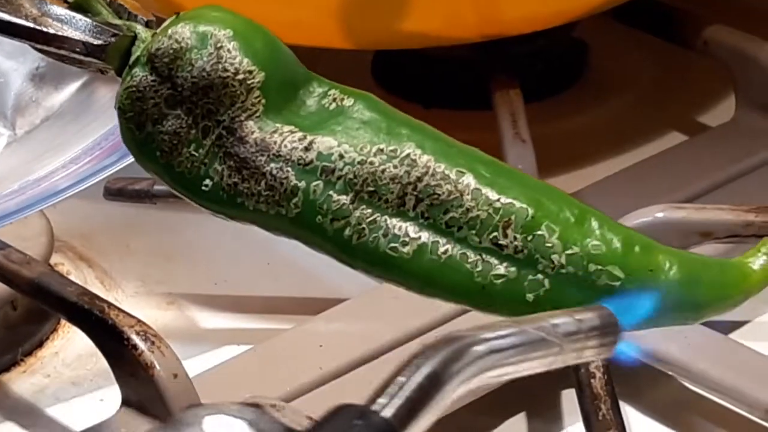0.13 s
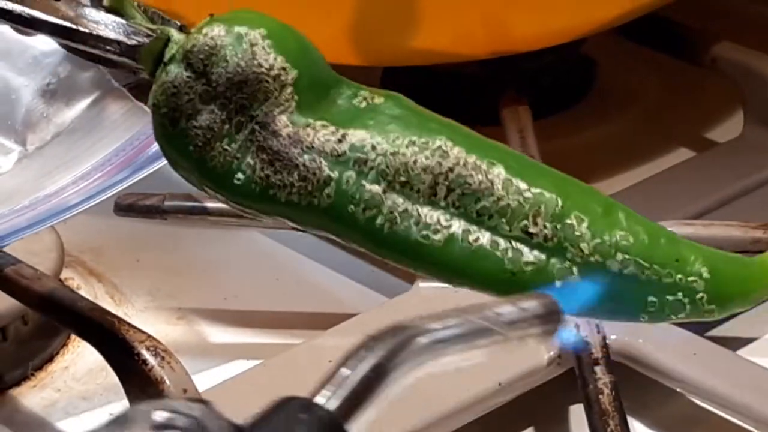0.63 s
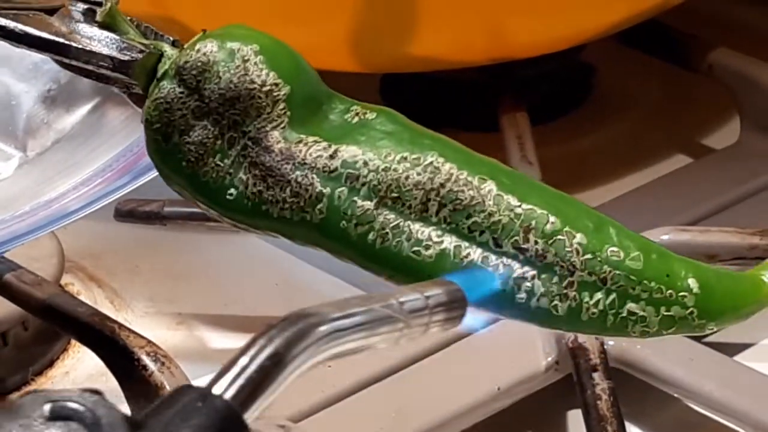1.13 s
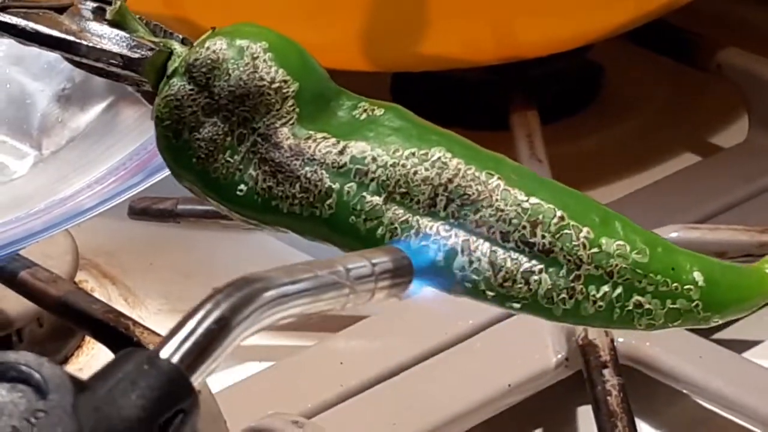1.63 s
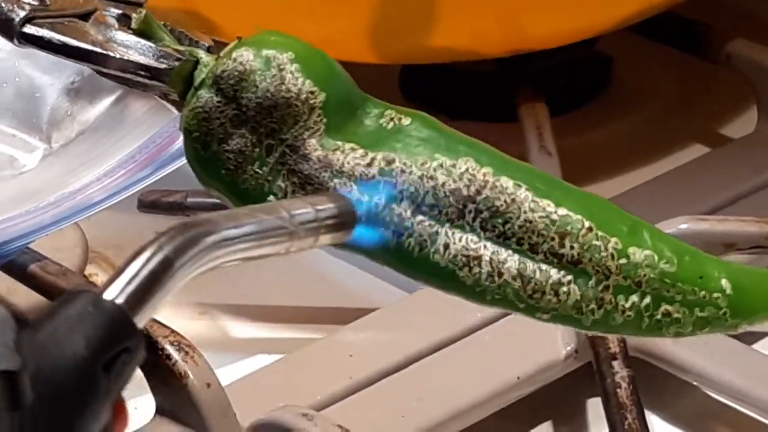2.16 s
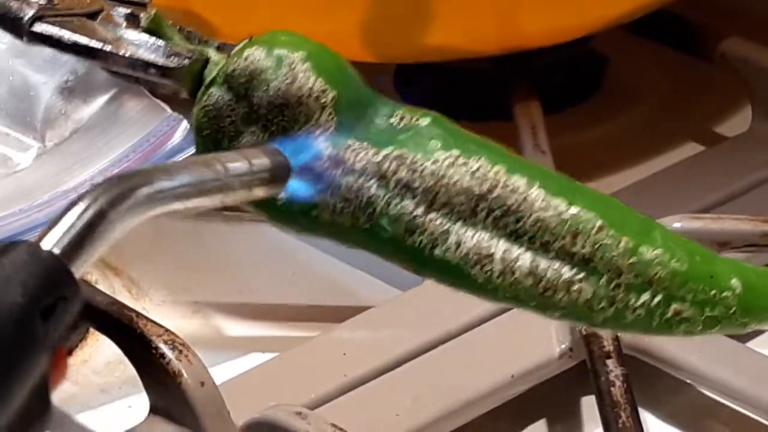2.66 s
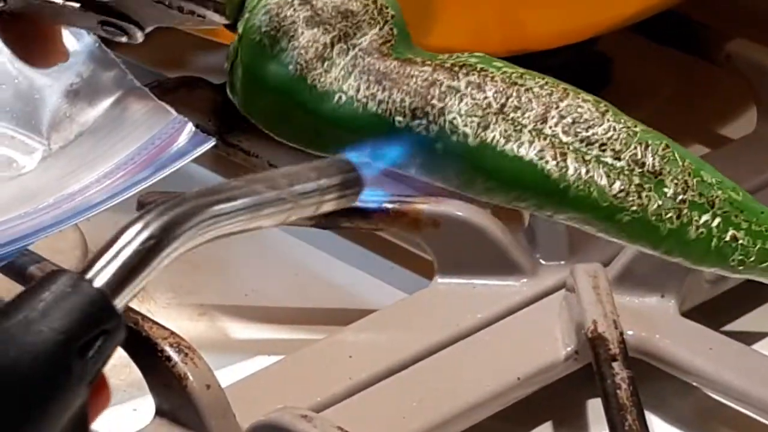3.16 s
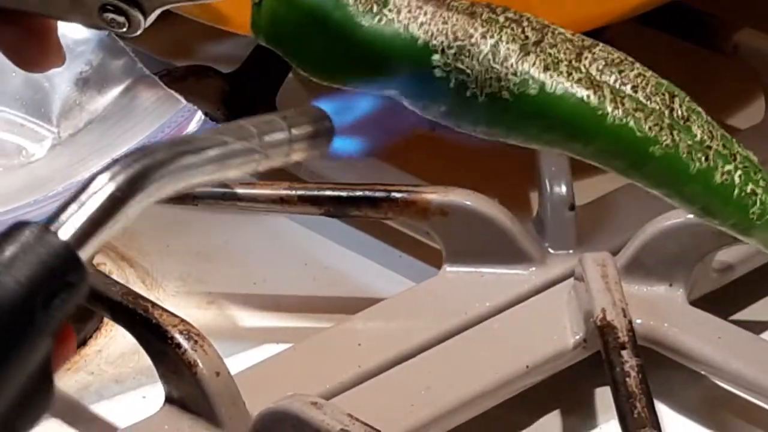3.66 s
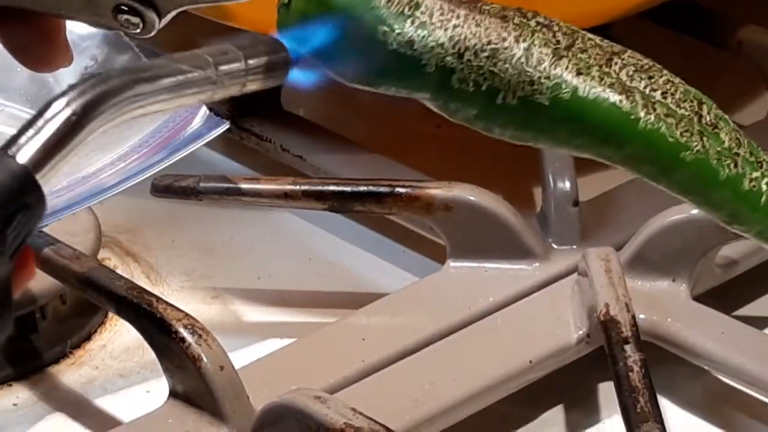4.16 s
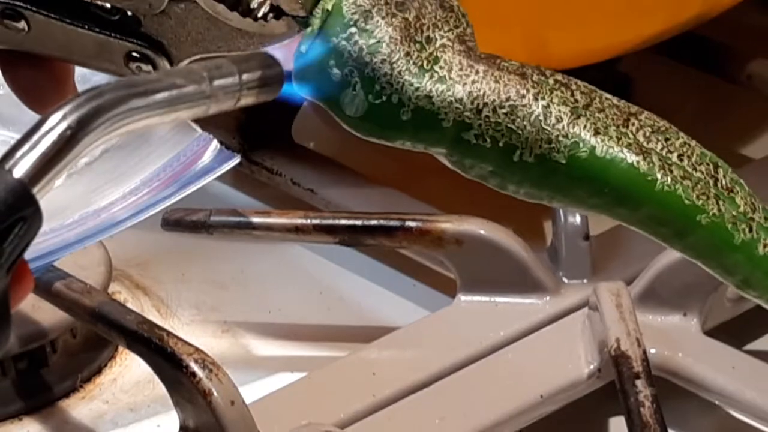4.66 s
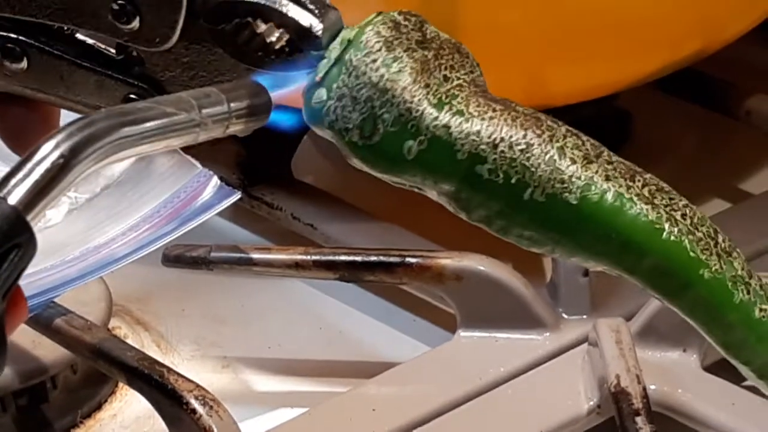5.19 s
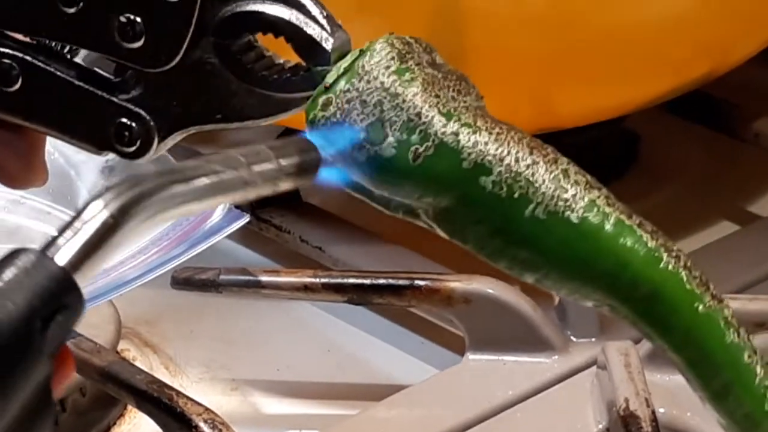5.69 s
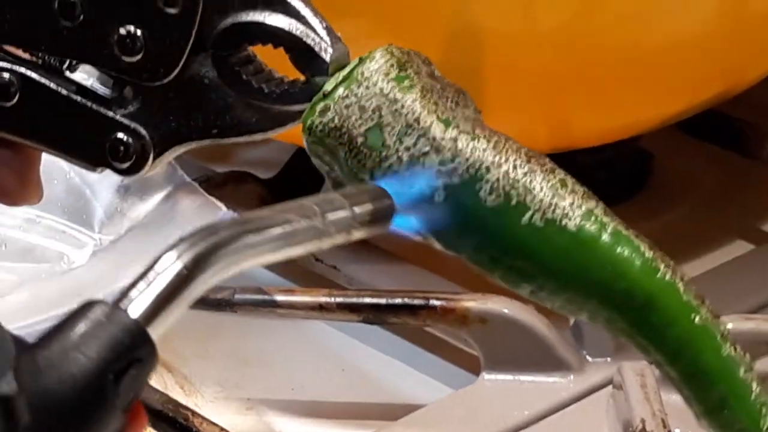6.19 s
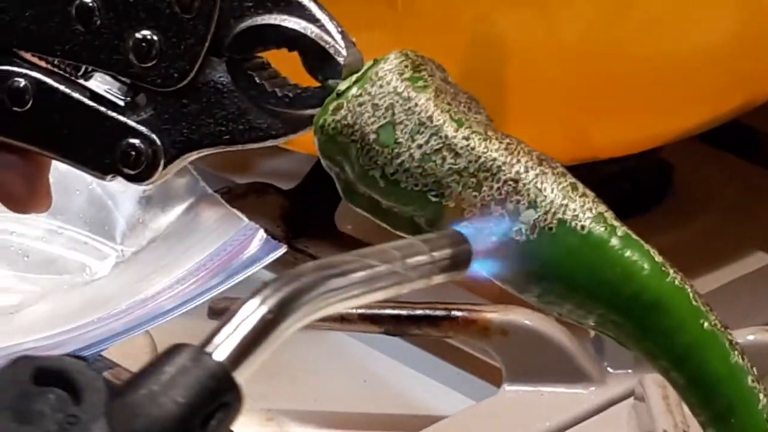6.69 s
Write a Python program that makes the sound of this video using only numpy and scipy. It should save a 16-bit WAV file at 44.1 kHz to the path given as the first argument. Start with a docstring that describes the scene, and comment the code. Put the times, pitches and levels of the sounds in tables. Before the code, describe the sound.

A steady, breathy gas flame with hollow tube tones plays under bright, erratic crackling as a pepper chars. Blisters break with dry clicks and tiny spurts of steam, some hitting the microphone as hard pops. Activity comes in waves with quieter gaps, and finishes busy and loud. Close phone pickup, short bright echoes from the stove.

```python
"""Torch on a pepper

Kitchen hob, phone close by: a gas torch roars softly against a pepper, noise with tube tones and a hum.
Hot skin sizzles as flickering hiss. Blisters burst: a click in ragged noise, then sputtering steam, at
times a dull thump, a one-sided pressure bump; tiny ones crackle between. Hard surfaces nearby echo
the pops; the phone colours the treble and rounds the loudest peaks."""
import sys
import numpy as np
from scipy import signal
from scipy.fft import rfft, irfft, next_fast_len
from scipy.io import wavfile
from scipy.ndimage import uniform_filter1d

SR = 44100
rng = np.random.default_rng(int(sys.argv[2]) if len(sys.argv) > 2 else 0)


def gain_from_db(level_db):
    """Convert decibel levels to linear amplitude factors (20 dB per decade)."""
    decades = np.asarray(level_db, float) / 20
    return 10 ** decades


def to_wav(sig):
    """Store sig (one row per channel, or 1-D mono) as 16-bit WAV at the path in sys.argv[1].

    Samples outside -1..1 are clipped; the rate is SR.
    """
    pcm = np.clip(np.atleast_2d(sig), -1, 1) * 32767
    pcm = np.round(pcm).astype(np.int16)
    wavfile.write(sys.argv[1], SR, pcm.T)  # frames by channels


N = 300762  # samples

# Drift of the steady sounds, at the phone's ports. Each row: time in seconds, flame roar level in dB,
# skin sizzle level in dB.
HEAT = [(0.0, -41, -46.5), (0.62, -43, -45.5), (0.89, -46, -51), (1.48, -47, -51), (2.081, -45, -54),
        (2.4, -43.5, -53), (2.97, -41.5, -49.5), (3.26, -43, -43.5), (3.849, -40.5, -48.5),
        (4.45, -40, -44.5), (4.74, -42.5, -47), (5.04, -43.5, -51), (5.34, -44.5, -52), (5.599, -44, -50.5),
        (5.82, -37.5, -43.5), (6.23, -38.5, -43), (6.52, -40, -46), (6.82, -41, -42)]
# Spectrum of the turbulent flame. Each row: frequency in Hz, relative density in dB per Hz.
ROAR_SPECTRUM = [(30, 7.5), (100, -8), (200, -4), (330, -4.5), (470, -13), (600, -1.5), (920, -5),
                 (1050, -11.5), (2500, -9.5), (2900, -15.5), (3700, -17), (4600, -12), (7000, -16.5),
                 (16000, -88)]
# Air columns of the burner tube, blown by the jet. Each row: frequency in Hz, width in Hz,
# level in dB re roar.
TUBE_TONES = [(650, 24, -24), (890, 24, -15.5), (1369, 53, -14.5), (2063, 96, -16.5), (2500, 60, -29),
              (3660, 77, -17)]
# A wavering hum that rides on the roar: mean pitch, starting peaks of note and octave in dB re roar rms.
HUM_HZ, HUM_DB, HUM_GROWS_DB_PER_S = 270.5, (-11, -17.5), 0.3

# The blisters that stand out. Each row: start in seconds, crack level in dB over its first 2 ms,
# steam level in dB re crack, top octave level in dB re the rest of the burst.
POPS = [(0.0971, -17.5, -3, 0.5), (0.1773, -18, -7, 4.5), (0.319, -23, -8, 8), (0.3649, -22.5, -25, 9.5),
        (0.3679, -21, -2.5, -1.5), (0.4607, -31, -11, 9), (0.4743, -25, -13, 4), (0.4789, -22, -7, 6.5),
        (0.5109, -21, -25, 9), (0.5119, -22, 1, 1), (0.545, -14.5, -5, 4.5), (0.6101, -27, -6, 4),
        (0.6167, -34, -30, 9), (0.688, -22, -6.5, 8.5), (0.7326, -39, 8, 5), (0.7384, -17, -5.5, 3),
        (0.7885, -33, -11, -1), (0.8203, -29, -25, 9), (0.8246, -21.5, -10, 1), (0.9375, -36, -3, 9),
        (0.9664, -21.5, -9.5, 5), (1.0305, -27, -18, 9), (1.0658, -32, 4, -2), (1.0766, -24, -8, 6.5),
        (1.1109, -22.5, -5, -0.5), (1.1444, -34.5, -5, 0), (1.1852, -28, -1, 0), (1.2067, -37, 4, 4),
        (1.2244, -27, -11, 2), (1.2495, -29, -2, 5.5), (1.2692, -28.5, -7, 1), (1.345, -34, 2, 0.5),
        (1.4499, -33.5, -1, 6), (1.4839, -18, -10.5, 0), (1.5089, -34, -30, -5), (1.5506, -26, -5, -0.5),
        (1.5979, -31, -5, 7), (1.6471, -34, -25, -4), (1.6516, -27, -4, -4), (1.6701, -35.5, 3, 1),
        (1.7438, -24.5, -3, 5), (1.8418, -40.5, 0, 0), (1.879, -36.5, -5, -4), (1.9018, -33, 0.5, -1),
        (1.981, -44.5, 8, -2), (2.0531, -40.5, 1, -1), (2.1235, -37, -8, -2), (2.2915, -44, -1, 3),
        (2.4851, -34.5, -2, 0), (2.5143, -15.5, -7, -5), (2.5363, -39, -30, 13), (2.5886, -31.5, -3, 2),
        (2.609, -34, 0.5, 3), (2.7027, -22.5, -5.5, 10), (2.788, -35, -6, 7), (2.7986, -31, 3.5, 4),
        (2.9924, -42, -2, 3), (3.0217, -44.5, 7, 4), (3.0639, -31.5, 0.5, 5), (3.1, -29, 3, 2.5),
        (3.166, -34, 6.5, 3), (3.1769, -26.5, -21, -3), (3.2479, -19, 2, -4), (3.2635, -29, -30, 4),
        (3.2934, -37.5, 8, 5), (3.3312, -33.5, 9, 0), (3.3807, -30.5, 3.5, 0.5), (3.4063, -35, -9, 6),
        (3.4285, -28, 2, 3), (3.4592, -18, -6, 2.5), (3.4832, -32, 1, 3), (3.5042, -29, 5, 7),
        (3.5103, -19, -6, 0), (3.5538, -37, -25, 1), (3.557, -27, 2, 0.5), (3.6002, -22, -10, 7.5),
        (3.6375, -23.5, 0, -1), (3.7343, -33, 0, 5), (3.7495, -38, -1, 6), (3.7585, -24.5, -4.5, 6.5),
        (3.7995, -37.5, 5.5, 2), (3.846, -31, 2, 3), (3.8695, -31, -25, 2), (3.873, -28.5, -1, 4),
        (3.9101, -24, 2, 2), (3.9267, -24, -2, 2), (3.978, -32, -2, 3), (3.9981, -26, -11, 3.5),
        (4.0395, -21, -9, 0), (4.0515, -27, -30, -4), (4.0969, -31.5, 2, 0), (4.1317, -36, 6, 0),
        (4.1532, -27, -1, 6.5), (4.1768, -24, -14, 6), (4.1919, -21, -9, 8), (4.2224, -30.5, -3, 3),
        (4.2502, -25, -10, 8), (4.2907, -23.5, -8, 10), (4.3286, -31.5, -1, 6), (4.4419, -20.5, -7.5, 6),
        (4.4899, -29, -28, 3), (4.4935, -23.5, -1, 6.5), (4.4991, -27.5, -14, 9), (4.5719, -36.5, 0, 0),
        (4.5932, -44, 6, 3), (4.618, -31.5, 3.5, 3), (4.6282, -37, -6, 9), (4.6609, -22.5, 0, 0.5),
        (4.767, -30.5, -4, 5), (4.8267, -35.5, -2, 2), (4.8726, -30, 0, 6), (4.8901, -31, 0, 1.5),
        (4.988, -38, 3.5, 4), (5.0285, -31.5, 2, 5.5), (5.1496, -37, -5, 9), (5.1777, -25.5, -2.5, 5.5),
        (5.3162, -31.5, -3, 7), (5.4152, -35.5, -1, 6), (5.5948, -37, 4, 2), (5.6398, -33, 1, 4),
        (5.6551, -35.5, 2, 4.5), (5.6612, -36, -1, 2), (5.6788, -36.5, -1, 2), (5.7195, -36.5, 4, 1),
        (5.75, -34, 1, -11), (5.7719, -24, 0.5, -0.5), (5.8148, -28, 5, 2.5), (5.8391, -29, 3, 4),
        (5.8568, -24.5, 3.5, -0.5), (5.8825, -31, 3, 2), (5.9041, -26.5, 3.5, 3.5), (5.9786, -26, 2, -2),
        (5.9916, -25.5, 5, 0.5), (6.0375, -30, -6, -1), (6.0726, -28.5, -1, -11), (6.0783, -21.5, -2, 2),
        (6.1256, -32, -10, -8), (6.1435, -29.5, 0, 1), (6.1658, -30, 2, 0), (6.1835, -21, -11, -1),
        (6.19, -19.5, -2, 2), (6.2869, -18.5, 0.5, 4.5), (6.3417, -32, 6, 0), (6.3643, -17, 1.5, -3),
        (6.4183, -29, -1, -8), (6.4248, -33, -4, 4), (6.4307, -19, -3, -3), (6.4648, -19.5, -7.5, 0.5),
        (6.5425, -29.5, -3, 1), (6.6139, -19, -7, 4), (6.6529, -31, 2, 1), (6.6974, -32, -10, 1),
        (6.7119, -17, -7, 0), (6.718, -20, -5, 7), (6.7838, -19, -4, 5.5), (6.8117, -28, 4, 7.5)]
# Colour of the cracks as the flame wanders over the skin. Each row: time in seconds, lowest ringing
# frequency in Hz, share bounced off the hob.
CRACK_COLOUR = [(0, 2300, 0.45), (.9, 2600, 0.34), (1.3, 3360, 0.39), (2.3, 3330, 0.12), (3.3, 3600, 0.2),
                (4.4, 3700, 0.035), (5.9, 4080, 0.043), (6.45, 3120, 0.23), (6.82, 3220, 0.47)]
TOP_SCATTER_DB, LOW_SCATTER = 3, 0.16  # rms scatter: top of the crackles; low edge as a share of itself
CRACKLES, CRACKLE_DB = 600, -4  # number of small bursts; level near that of the faintest, re sizzle
CRACK_RISE_MS, CLICK_SHARE = 0.25, 0.9  # opening of the tear; amplitude of the click re the ragged noise
TEAR_MS = (0.15, 0.55)  # shortest and longest fade of a tear, to 1/e
STEAM_RISE_S, STEAM_T60_S, TOP_STEAM_T60_S = 0.0015, 0.055, 0.065
SPLIT_HZ = 7400  # where a burst divides into body and top
STEAM_DB, TOP_STEAM_DB = -3, -5  # added to a row's steam level, below and above the split
BOUNCE_M = 0.0568  # extra path of the bounce
BURST_LENGTH = 2048  # samples

KITCHEN_T60_S, KITCHEN_DB = 0.16, -15  # decay of the echoes; their energy re an uncoloured click
# Deep blisters that also blow a slug of air at the phone. Each row: time in seconds, peak level in dB,
# length in ms at half height, without the tip.
THUMPS = [(0.5453, -4.5, 0.5), (0.546, -19, 2.6), (0.7382, -21.5, 1.2), (0.9665, -7.5, 0.2),
          (1.0766, -0.5, 0.18), (1.4838, -21.5, 0.78), (1.745, -15.5, 0.19), (2.5145, -12, 0.33),
          (2.703, -2, 0.21), (3.248, -2.5, 0.045), (3.4601, -14, 0.26), (3.6003, 0, 0.17),
          (4.2909, -20, 0.32), (4.442, -9.5, 0.26), (6.2869, -18, 0.74), (6.465, -16, 0.26),
          (6.7164, -11.5, 0.48), (6.7839, -5.5, 0.16)]
TIP_SHARE = 0.5  # sharp tip on each slug, a third as long

# A valley in the whole sound, likely a bounce off the hob, that sinks as pepper and torch are lifted
# and rises a little at the end, with a crest above it. Each row: time in seconds, valley frequency in Hz,
# share added at the crest.
VALLEY = [(0, 3230, 1), (1.4, 2950, 0.57), (2.6, 2820, 0.66), (4.2, 2650, 0.34), (5, 2560, 0.14),
          (6.82, 2680, 0.45)]
VALLEY_WIDTH_HZ, VALLEY_SHARE = 550, 0.62
CREST_HZ, CREST_WIDTH_HZ = 3870, 400

# Unlikeness of the phone's two microphone ports. Each row: frequency in Hz, side minus mid in dB.
PORTS = [(30, -11), (150, -31.5), (700, -25.5), (1500, -20.5), (2500, -23.5), (4500, -12), (7000, -15),
         (9000, -10), (15000, -14)]
# Resonances of the phone's port and case. Each row: frequency in Hz, gain in dB.
PHONE = [(300, 2), (2000, 2), (2550, 6), (3350, 2.5), (3650, 1.5), (4150, 0.5), (4450, -1), (5600, 0),
         (6650, 5), (7250, 1.5), (7800, -5.5), (8700, 1.5), (9700, 2), (10900, 5), (12300, -2.5),
         (12900, 3), (14000, 1.5), (15100, 5), (15700, -2)]
LOW_CUT_HZ = 220
# Band edges: low rumble eased and the treble cut steeply near 16 kHz. Each row: frequency in Hz, gain in dB.
BAND_EDGES = [(20, -7), (90, 0), (15750, 0), (15900, -8), (16550, -14), (16900, -70)]


def colour(x, points):
    """Weight the spectrum by (Hz, dB) points."""
    hz, db = np.transpose(points)
    size = next_fast_len(x.shape[-1])
    f = np.maximum(np.fft.rfftfreq(size, 1 / SR), 1)
    gain = gain_from_db(np.interp(np.log(f), np.log(hz), db))
    return irfft(rfft(x, size) * gain, size)[..., :x.shape[-1]]


def causal(points):
    """Response that only rings after a click, from the cepstrum of the log gain."""
    click = np.zeros(1024)
    click[0] = 1
    cepstrum = irfft(np.log(np.abs(rfft(colour(click, points)))))
    # fold the half before the click onto the half after it
    cepstrum[1:512] *= 2
    cepstrum[513:] = 0
    return irfft(np.exp(rfft(cepstrum)))[:512]


def unit(x):
    """Scale to rms 1 along time."""
    return x / np.sqrt(np.mean(x ** 2, axis=-1, keepdims=True))


def walk(rate):
    """Random levels held 1 / rate s and slewed twice; spread near 1."""
    hold = int(SR / rate)
    steps = np.repeat(rng.standard_normal(N // hold + 1), hold)
    return 1.3 * uniform_filter1d(uniform_filter1d(steps, hold), hold)[:N]


def ports(mid, other):
    """Left and right ports: the same sound plus and minus an unrelated share."""
    side = colour(other, PORTS)
    return np.array([mid + side, mid - side])


def flame(roar_db):
    """Fluttering turbulence, the narrow tones of the tube and a hum that wavers in pitch and level."""
    both = unit(colour(rng.standard_normal((2, N)), ROAR_SPECTRUM))  # mid and side feeds
    for hz, width, db in TUBE_TONES:
        resonance = signal.iirpeak(hz, hz / width, fs=SR)
        tone = signal.lfilter(*resonance, rng.standard_normal((2, N)))
        both = both + gain_from_db(db) * unit(tone)
    phase = 2 * np.pi * np.cumsum(HUM_HZ + 2.34 * walk(8.3)) / SR
    grows_db = HUM_GROWS_DB_PER_S * np.arange(N) / SR
    quarter_turn = np.array([[0], [np.pi / 2]])  # between the two feeds
    for k, db in enumerate(HUM_DB):
        level = gain_from_db(db + grows_db + 3.45 * walk(20) / (k + 1))
        both = both + level * np.sin((k + 1) * phase + quarter_turn)
    # the upper roar is beamed, so it drifts as the torch turns
    upper = colour(both, [(900, -40), (1500, 0), (16000, 0)]) * 0.12 * walk(3)
    return ports(*(both + upper)) * gain_from_db(roar_db + 1.2 * walk(18))


def sizzle(sizzle_db):
    """Steam seeping from the hot skin: a flickering hiss."""
    hiss = colour(rng.standard_normal((2, N)), [(1500, 2), (3500, 7), (8000, 0), (16000, 0)])
    return ports(*unit(hiss)) * gain_from_db(sizzle_db + 1.8 * walk(60) + 2 * walk(9))


def crackles(times, sizzle_db):
    """Small blisters at random, mostly faint, denser and louder where the skin is hot."""
    when, size, steam, top = rng.random((CRACKLES, 4)).T
    grid = np.linspace(0, N / SR, num=200)
    heat = np.cumsum(gain_from_db(np.interp(grid, times, sizzle_db)))
    s = np.interp(when * heat[-1], heat, grid)
    crack_db = np.interp(s, times, sizzle_db) + CRACKLE_DB - 3.5 * np.log(size + 0.08)
    # sqrt(12) brings an even spread to rms 1
    top_db = TOP_SCATTER_DB * np.sqrt(12) * (top - 0.5)
    return np.transpose([s, crack_db, -16 + 10 * steam, top_db])


def character(rows):
    """Add low edge, bounce and tear length: the slow drift plus each blister's own chance."""
    s, low_hz, bounce = np.transpose(CRACK_COLOUR)
    low_chance, tear_chance = rng.random((len(rows), 2)).T
    low = np.interp(rows[:, 0], s, low_hz) * (1 + LOW_SCATTER * np.sqrt(12) * (low_chance - 0.5))
    tear_ms = TEAR_MS[0] * (TEAR_MS[1] / TEAR_MS[0]) ** tear_chance
    return np.column_stack([rows, low, np.interp(rows[:, 0], s, bounce), tear_ms])


def bursts(rows):
    """Each blister: one click with ragged noise about a millisecond long, then sputtering steam."""
    s, crack_db, steam_db, top_db, low_hz, bounce, tear_ms = (c[:, None] for c in np.transpose(rows))
    lead = 128  # samples ahead of the click
    t = (np.arange(BURST_LENGTH) - lead) / SR
    f = np.fft.rfftfreq(BURST_LENGTH, 1 / SR)
    # direct sound plus its delayed bounce, at 343 m/s
    hob = 1 + np.clip(bounce, 0, 1) * np.exp(-2j * np.pi * f * BOUNCE_M / 343)
    body_band = hob * f ** 4 / (f ** 4 + low_hz ** 4) / (1 + (f / SPLIT_HZ) ** 12)
    top_band = hob / (1 + (SPLIT_HZ / np.maximum(f, 1)) ** 12)
    noise = rng.standard_normal((len(rows), 2, BURST_LENGTH))
    # the tear opens fast and fades more slowly
    opening = np.exp(-(1000 * t / CRACK_RISE_MS) ** 2)
    tear = np.where(t < 0, opening, np.exp(-1000 * np.abs(t) / tear_ms))
    power = np.sum(tear ** 2, axis=1, keepdims=True)
    click = CLICK_SHARE * np.sqrt(power) * (t == 0) * np.sign(noise[:, 1, :1])
    crack = rfft(noise[:, 0] * tear + click)
    sputter = gain_from_db(2.5 * unit(uniform_filter1d(noise[:, 1], size=60)))
    steam = (t > 0) * (1 - np.exp(-np.abs(t) / STEAM_RISE_S)) * sputter
    shape = 0
    for band, db, jet_db, t60 in ((body_band, 0, STEAM_DB, STEAM_T60_S),
                                  (top_band, top_db, TOP_STEAM_DB, TOP_STEAM_T60_S)):
        # energy as if the crack held its level for 2 ms
        snap = unit(irfft(crack * band)) * np.sqrt(0.002 * SR / BURST_LENGTH)
        hiss = unit(irfft(rfft(noise[:, 0]) * band))
        jet = gain_from_db(steam_db + jet_db) * hiss * steam * np.exp(-np.log(1000) * t / t60)
        shape = shape + gain_from_db(db) * (snap + jet)
    out = np.zeros(N + BURST_LENGTH)
    for at, one in zip((s[:, 0] * SR).astype(int), gain_from_db(crack_db) * shape):
        out[at:at + BURST_LENGTH] += one
    return out[lead:N + lead]


def kitchen(x):
    """Hard surfaces: a decaying spray of echoes, weighted to the treble, unlike at the two ports."""
    t = np.arange(int(0.4 * SR)) / SR
    decay = (t > 0.003) * np.exp(-np.log(1000) * t / KITCHEN_T60_S)
    echoes = rng.standard_normal((2, len(t))) * decay
    echoes = colour(echoes, [(300, 2.6), (6000, 27), (16000, 25)])
    echoes = gain_from_db(KITCHEN_DB) * echoes / np.sqrt(np.sum(echoes[0] ** 2))
    return ports(*signal.fftconvolve(x[None], echoes, axes=1)[:, :N])


def thumps(sign):
    """Slugs of air: one-sided pressure bumps, just ahead of the crack's ringing."""
    out, t = np.zeros(N), np.arange(-100, 100) / SR
    for (s, db, ms), way in zip(THUMPS, sign):
        at = int(s * SR) - 100
        bump = np.exp(-4 * np.log(2) * ((t + 0.000071) / (ms / 1000)) ** 2)
        tip = bump ** 9
        out[at:at + len(t)] += way * gain_from_db(db) * ((1 - TIP_SHARE) * bump + TIP_SHARE * tip)
    return out


def moving_band(x, hz, width_hz):
    """Pick out a moving band: shift it down to zero, smooth it, shift it back."""
    turn = np.exp(2j * np.pi * np.cumsum(hz) / SR)
    smoother = signal.butter(1, width_hz / 2, fs=SR)
    return 2 * (signal.lfilter(*smoother, x / turn) * turn).real


def valley(x):
    """Thin out the moving valley and lift the crest, as a bounce cancels one band and aids another."""
    s, hz, crest = np.transpose(VALLEY)
    t = np.arange(N) / SR
    valley_hz, crest_share = np.interp(t, s, hz), np.interp(t, s, crest)
    thinned = x - VALLEY_SHARE * moving_band(x, valley_hz, VALLEY_WIDTH_HZ)
    return thinned + crest_share * moving_band(x, np.full(N, CREST_HZ), CREST_WIDTH_HZ)


def scene():
    """Flame, sizzle and bursts in the kitchen, as they reach the phone."""
    s, roar_db, sizzle_db = np.transpose(HEAT)
    t = np.arange(N) / SR
    rows = character(np.vstack([POPS, crackles(s, sizzle_db)]))
    pops = bursts(rows) + thumps(np.ones(len(THUMPS)))
    # each slug of air reaches one port or the other more squarely
    apart = bursts(rows) + thumps(2.7 * rng.choice([-1, 1], len(THUMPS)))
    steady = flame(np.interp(t, s, roar_db)) + sizzle(np.interp(t, s, sizzle_db))
    return valley(ports(pops, apart) + kitchen(pops) + steady)


def roll_off(x):
    """The treble ends steeply here."""
    return signal.sosfilt(signal.butter(12, 17150, fs=SR, output="sos"), x)


def record(dry):
    """The phone close by: port resonances, soft overload, low cut and band limits."""
    x = signal.fftconvolve(dry, causal(PHONE)[None], axes=1)[:, :N]
    x = np.tanh(1.15 * x) / 1.15  # rounds the loudest peaks
    low_cut = signal.butter(2, LOW_CUT_HZ, "high", fs=SR, output="sos")
    x = colour(signal.sosfilt(low_cut, x), BAND_EDGES)
    return roll_off(x)


dry = scene()
out = record(dry)
to_wav(out)
```